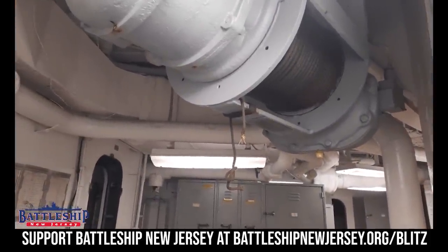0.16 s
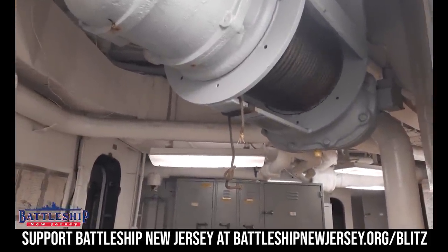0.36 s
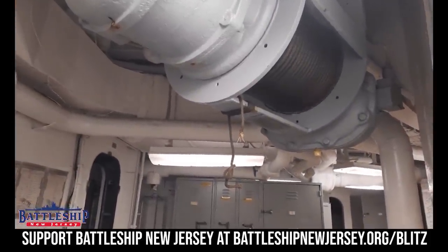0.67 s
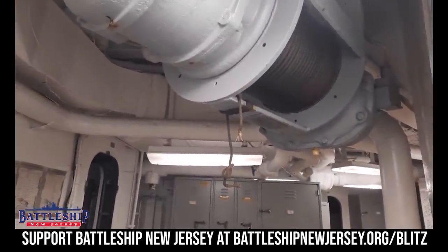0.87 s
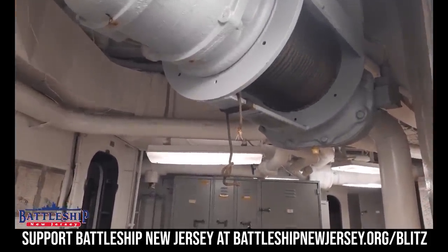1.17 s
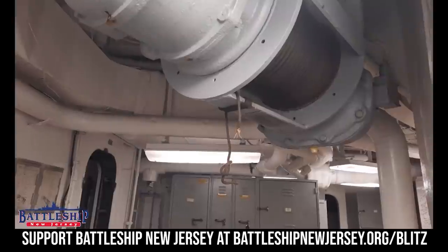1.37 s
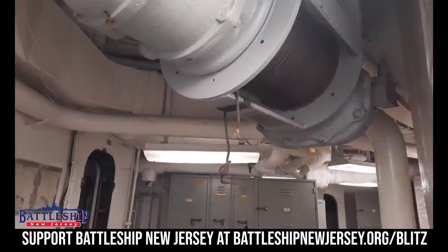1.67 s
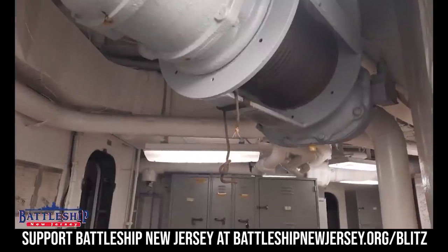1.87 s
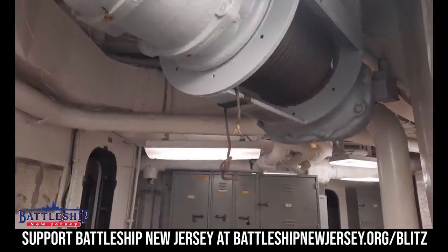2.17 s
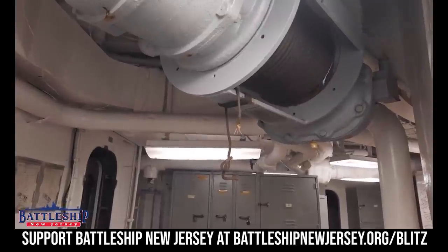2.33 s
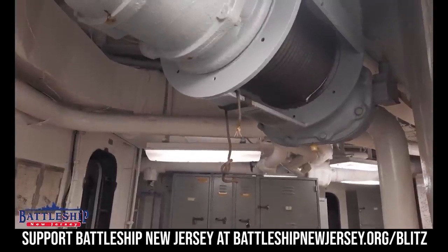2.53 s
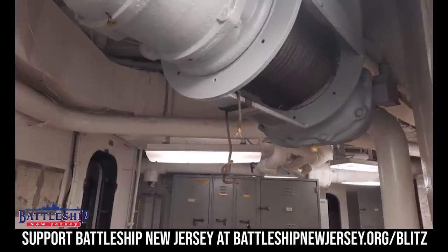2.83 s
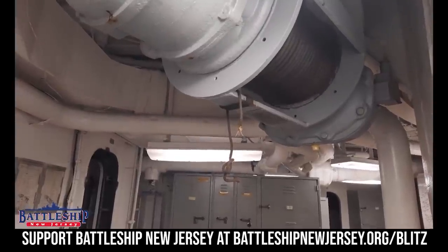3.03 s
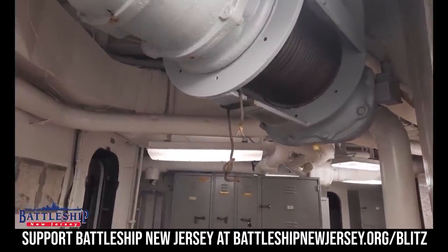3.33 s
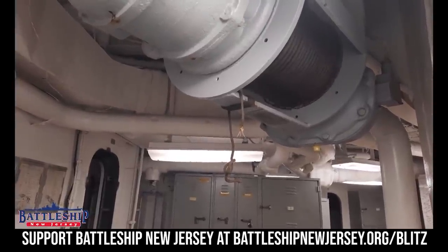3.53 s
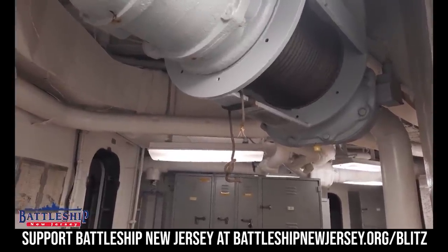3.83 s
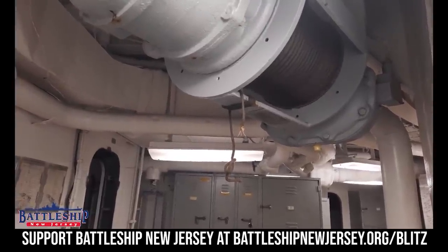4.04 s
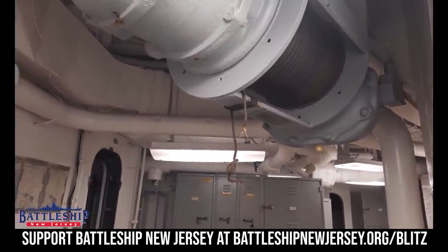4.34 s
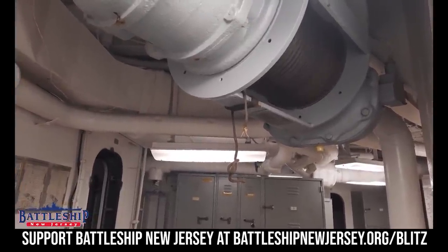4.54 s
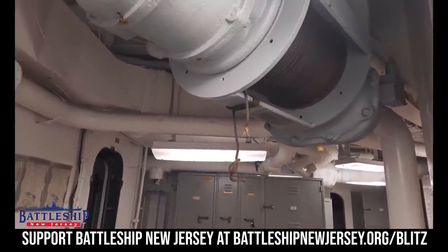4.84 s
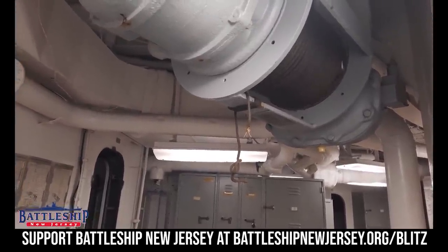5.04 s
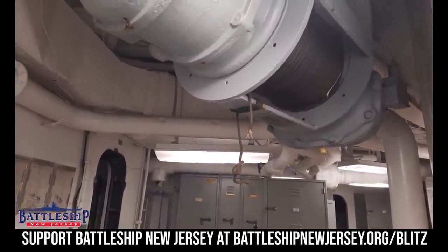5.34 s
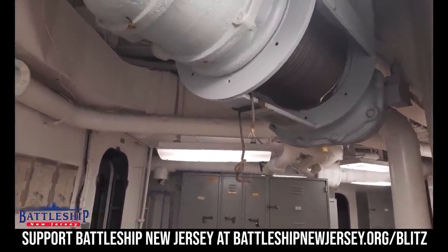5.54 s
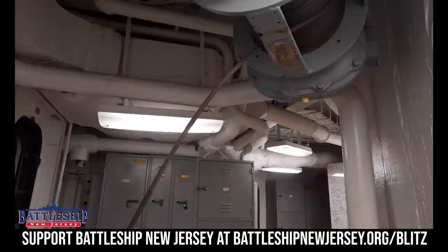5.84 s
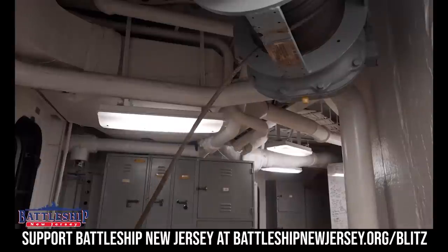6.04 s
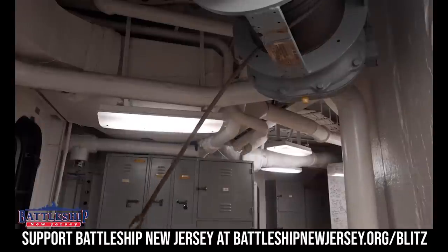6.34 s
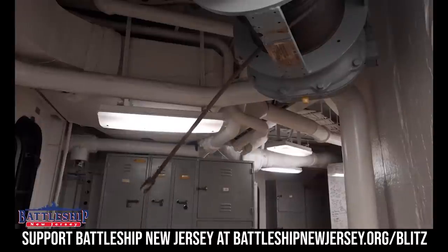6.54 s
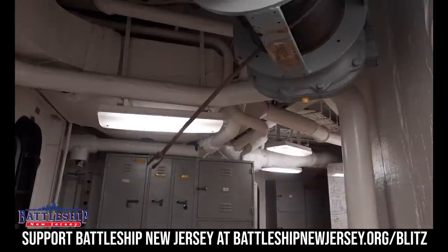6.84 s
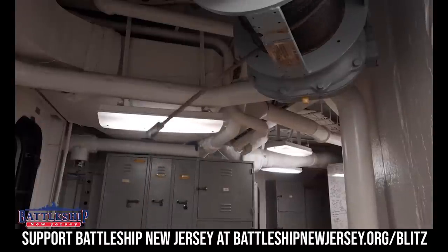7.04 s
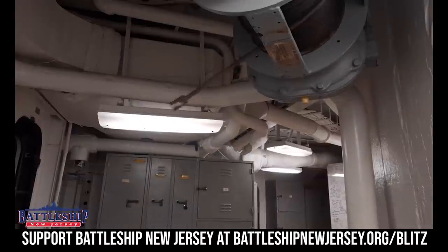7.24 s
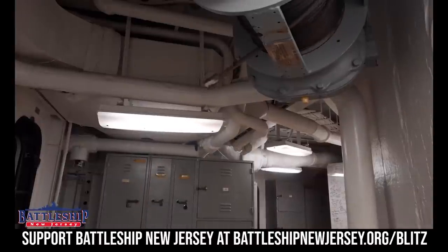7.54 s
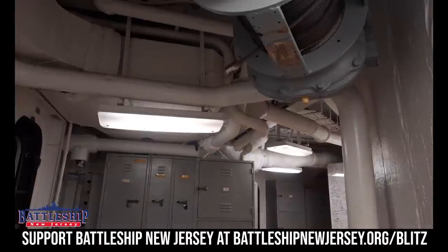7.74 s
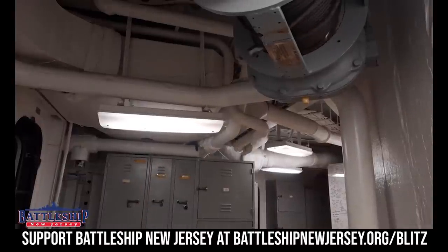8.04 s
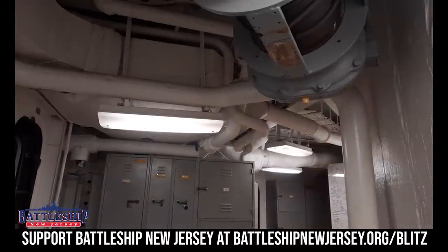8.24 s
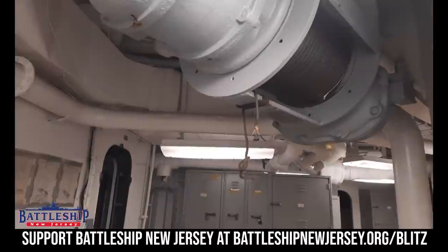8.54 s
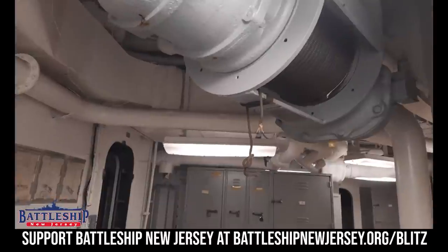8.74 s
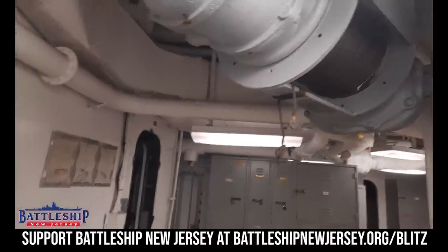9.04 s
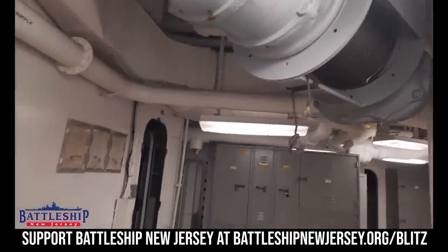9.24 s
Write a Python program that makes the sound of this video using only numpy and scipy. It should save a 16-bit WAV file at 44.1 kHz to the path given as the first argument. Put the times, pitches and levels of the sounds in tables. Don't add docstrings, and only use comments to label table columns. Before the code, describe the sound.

From 0 to about 5.1 seconds an electric hoist winch runs close by in muffled, narrow mono: a loud, steady, gritty gear grind strongest around 250 to 900 Hz, with a wavering whine. Slack cable slaps lightly near 0.8, 2.6 and 4.8. At 5.15 brake shoes crack, a duller second knock follows at 5.23, and the drum moans while its treble drains away. At 5.64 the sound drops abruptly to a distant, much quieter stereo perspective. A switch clacks at 5.77, the motor hums and winds cable, growing stronger from 7.1 to 8.0, with faint chain shivers and steel ticks, treble leaning right. It brakes at 8.06, with small clicks around 8.4. At 8.51 it cuts back to mono: a heavy metal clunk peaks around 8.55, bounces briefly and is damped by 8.8. Low ventilation rumble and electric hum remain, with a soft knock at 9.16.

```python
import sys
import numpy as np
from scipy import signal
from scipy.fft import rfft, irfft, next_fast_len
from scipy.io import wavfile
from scipy.ndimage import uniform_filter1d

SR = 44100
rng = np.random.default_rng(int(sys.argv[2]) if len(sys.argv) > 2 else 0)


def gain_from_db(level_db):
    decades = np.asarray(level_db, float) / 20
    return 10 ** decades


def persist_wave(psi):
    counts = np.round(np.clip(psi, -1, 1) * 32767).astype(np.int16)
    wavfile.write(sys.argv[1], SR, np.atleast_2d(counts).T)


N = 414540

PART_STARTS_S = [0, 5.64116, 8.50775]
CUT_PRESSURE = [.025, -.1, -.07]

SHAFT_HZ = 29.84
CLOSE_DB = -18
BRAKE_S, RUN_DOWN_S = 5.153, .13
# frequency in Hz, level in dB per Hz.
GRIND_COLOUR = [(15, -84), (25, -56), (69, -34.5), (118, -16), (190, -15.5), (250, -11), (342, -9),
                (382, -8), (418, -4), (665, -7), (760, -3), (969, -12), (1260, -10.5), (1480, -13),
                (1650, -9), (3830, -30.5), (5000, -41.5), (6500, -75), (11000, -120)]
# frequency in Hz, width in Hz, height in dB above the grind.
CASING_PEAKS = [(127, 49, 3), (172, 8, 4.5), (239, 23, 3), (267.4, 18, 6), (300, 12, 4), (312, 9.9, -5),
                (337, 20, 7), (351.2, 16, 5), (363, 13, 3), (382, 10, -2.5), (429.7, 12, 6), (438.4, 7, -6),
                (450, 9.1, 3), (462, 8, -3), (482.5, 20, 6), (500, 20, 6.5), (519, 7, -4), (530.2, 14, 10),
                (549.7, 14, 5.5), (600, 12, -3), (625, 16, 4.5), (640, 8, -2), (700, 20, -2), (737, 30, 5),
                (759, 20, 4), (784, 14, -6), (820, 10, -4), (860, 20, 2), (935, 26, 1.5), (955, 9.2, 2),
                (1035, 20, 4.5), (1070, 15, 1.5), (1290, 74, 1.5), (1460, 60, -2.5), (1573, 53, 3),
                (1660, 47, 1.5), (1850, 40, 2), (1888, 140, 4), (2210, 30, 1.5), (2270, 120, -3),
                (2456, 71, 3.5), (2709, 78, 7), (2820, 80, -3), (2960, 80, 1.5), (3767, 110, 6)]
# time in seconds, level in dB about the mean.
DRUM_LOAD = [(0.0, 0.5), (.04, 0), (.2, 0), (1.2, 0.5), (2.3, -1), (2.55, 0.5), (3.4, -0.5), (4.1, 0),
             (4.55, -0.5), (4.8, 1.5), (5.01, .5), (5.13, -1.5), (5.165, 2.5), (5.205, 1.5), (5.222, 0),
             (5.235, 2.5), (5.33, 2.5), (5.57, 0.9), (5.635, -6)]
# multiple of shaft speed, level in dB rms.
GEAR_WHINE = [(14, -29), (26, -31.5), (27, -34), (28, -29.5), (42, -37), (43, -38.5), (55, -37), (56, -37),
              (57, -43), (62, -39.5), (70, -42)]
# frequency in Hz, level in dB rms.
MOTOR_HUM = [(119.3, -45.5), (172.3, -46)]
# time in seconds, level in dB, brightness in dB per octave,
# scale of the decay time, rise in seconds.
BRAKE_BLOWS = [
    (5.139, -43.5, 9.5, 0.06, 0.0015),
    (5.1525, -23.5, 4, .06, .0008),
    (5.156, -22.5, -1.5, 0.35, 0.0026),
    (5.179, -35, -2, .06, .001),
    (5.2255, -13.5, -9, .05, .0006),
    (5.229, -12, -9.5, 0.71, 0.0045),
    (5.28, -22, -10, 0.87, 0.015),
]
# frequency in Hz, level in dB per Hz.
SHOE_COLOUR = [(300, -26), (1000, -12), (2500, -5), (3800, -2), (4700, 0), (5050, -5), (5150, -14)]
# frequency in Hz, time in seconds to fall by 60 dB.
SHOE_T60 = [(300, .4), (2000, 0.84), (5000, 0.53)]
# time in seconds,
# level in dB, brightness in dB per octave, # scale of the decay time, rise in seconds.
CABLE_RATTLES = [
    (.762, -30, 0, .15, .003),
    (2.626, -26, -2, .15, .003),
    (2.638, -21.5, 0, .25, .002),
    (3.125, -36, 2, .12, .002),
    (4.806, -25, 0, .2, .003),
    (4.84, -29, 0, .15, .002),
    (4.982, -31, 0, .12, .002),
    (5.154, -24, -2, .3, .001),
    (5.231, -30.5, 6, .55, .002),
]
# frequency in Hz, level in dB per Hz.
CABLE_COLOUR = [(1600, -21.5), (2100, -3), (2480, 0), (3000, -5.5), (3600, -16.5), (4900, -21)]
# time in seconds, peak in dB,
# frequency in Hz, 60 dB decay in seconds.
SHOE_CRACKS = [(5.153, -14, 840, .04), (5.178, -13.5, 385, 0.15), (5.225, -10, 630, .012),
               (5.1533, -9.5, 4900, 0.015), (5.1536, -11, 4350, .014), (5.1552, -16, 5000, .02),
               (4.6, -20, 2400, .015), (5.154, -19, 1800, .07), (5.1545, -13, 1700, .012),
               (5.158, -12.5, 2100, .01), (5.14, -32, 4950, .015), (5.2356, -23, 3500, .03),
               (5.203, -10, 700, .02)]
# time in seconds, peak in dB, frequency in Hz, 60 dB decay in seconds.
FRAME_THUMP = [
    (5.151, -16.5, 112, .11),
    (5.16, -24, 92, .2),
]
# frequency in Hz, width in Hz, level in dB at the bite,
# 60 dB decay in seconds.
DRUM_MODES = [(1860, 30.4, -27.5, 1.7), (2100, 30, -35.5, 1.7), (2280, 40, -36.5, 2),
              (2730, 45, -36.5, 1.5), (3768, 40, -40, 1.2), (520, 40, -23, 3), (744, 28, -19, 3.2)]
DRAG_S, DRAG_RISE_S = 5.23, .08
WARMING_HZ, WARMING_DB_PER_S = 330, -0.9
MESH_HZ, MESH_LOSS_DB_PER_S = 1600, 15
MOAN_HZ, MOAN_OCTAVES = 740, 0.64
CLOSE_MOAN_DB, CLOSE_MOAN_S = 5, .22
DULLING_DB_PER_S, DULL_HZ, DULL_OCTAVES = 30.5, 4200, 1.3
DECK_T60_S, DECK_DB = .4, -14
MONO_CUT_HZ, FRINGE_HZ, FRINGE_S = 5125, 5030, .028

FAR_DB = -45
FAR_ON_S, SPIN_UP_S, FAR_BRAKE_S = 5.775, .03, 8.06
FAR_MOAN_DB, FAR_MOAN_S = 6, .14
FAR_DULLING_DB_PER_S, FAR_DULLEST_S, FAR_DULL_HZ = 45, .2, 2200
# frequency in Hz, level in dB per Hz.
FAR_WINCH_COLOUR = [(15, -60), (25, -45), (41, -26), (70, -13), (113, -11.5), (133, -13), (148, -20.5),
                    (333, -9), (361, -13), (789, -20), (927, -24.5), (1720, -26.5), (3980, -47),
                    (4940, -50), (5960, -51.5), (15700, -68)]
# frequency in Hz, width in Hz, height in dB above the noise.
FAR_ROOM_PEAKS = [(119, 39, 3.5), (338, 49, 7.5), (772, 60, 5), (1180, 40, 1), (1280, 40, 2.5),
                  (1530, 80, 4.5), (1690, 35, 4), (2033, 93, 9), (2350, 280, 7), (2606, 50, 10.5),
                  (2770, 55, 9), (3010, 50, 1), (3520, 50, -1), (3700, 79, 3.5), (3880, 110, 6.5),
                  (4000, 240, 7), (4450, 90, 5), (6020, 140, 8), (13650, 4100, 4.5), (9800, 1500, -7)]
# time in seconds, level in dB.
FAR_HAUL = [
    (5.65, -1),
    (5.68, 0.5),
    (6.1, -2),
    (6.75, -1),
    (7.1, 0),
    (7.6, 6),
    (7.85, 5.5),
    (8.03, 7.5),
    (8.2, 7),
    (8.5, 0),
]
# frequency in Hz, change in dB.
MOTOR_OFF_LOSS = [(150, 2), (600, -12), (2300, -26), (4000, -20), (9000, -12)]
# frequency in Hz, level in dB rms.
FAR_HUM = [(101.4, -50), (119.8, -46), (147.5, -57), (172.3, -62), (331, -56)]
# multiple of shaft speed, level in dB rms.
FAR_GEAR_WHINE = [(26, -77), (35, -72), (39, -72), (43, -72), (52, -76), (56, -73), (57, -66.5)]
# time in seconds, peak in dB, frequency in Hz, 60 dB decay in seconds.
DECK_THUDS = [
    (5.81, -42, 58, .5),
    (5.87, -28, 127, .2),
    (8.365, -35.5, 172, 0.32),
]
# time in seconds, level in dB, brightness in dB per octave,
# scale of the decay time, rise in seconds.
CLACK_BLOWS = [(5.748, -62, 2.5, 0.54, .01), (5.758, -54, 0.5, .5, .003), (5.7665, -47, 2, .4, .001),
               (5.771, -39, 2.5, .3, .001), (5.7785, -35.5, 5, .08, .0005), (5.779, -33, 2, 0.85, 0.002),
               (5.8, -31, 1, 1.14, 0.014), (5.86, -44, -8, 0.76, 0.0075), (6.118, -52, 2, 0.68, .001),
               (6.175, -55, 0.5, .4, .003), (6.275, -68, -3.5, .4, 0.0027), (7.928, -49, 3.5, .3, 0.00097),
               (7.931, -45.5, 3.5, 0.71, 0.001), (8.02, -60.5, 3.5, 2.6, .004),
               (8.13, -55, 3.5, .5, 0.0089), (8.37, -53.5, 6, 0.57, 0.001), (8.428, -42, -1, .8, 0.0043),
               (8.449, -38, -2, 1.1, .004), (8.474, -62, 9.5, 0.05, 0.00043), (8.478, -70, 7.5, 0.46, .003)]
# frequency in Hz, level in dB per Hz.
STEEL_COLOUR = [(59, -50), (100, -18), (129, -12), (364, 1.5), (489, -6.5), (866, -2.5), (1270, -7.5),
                (2720, -12.5), (8520, -24.5), (10300, -36.5), (15700, -29.5)]
# frequency in Hz, time in seconds to fall by 60 dB.
STEEL_T60 = [(100, 0.98), (500, 1), (2000, 0.4), (6000, 0.36), (15000, 0.27)]
# frequency in Hz, width in Hz, level in dB.
HOOK_MODES = [(1690, 42, -11), (2000, 110, -4), (2630, 160, -12), (4690, 180, -5), (6570, 34, -14),
              (8030, 43, -25)]
# time in seconds, peak in dB, frequency in Hz, 60 dB decay in seconds.
STEEL_PINGS = [(6.118, -66, 11250, .15), (6.12, -59, 4740, .22), (6.119, -60, 5050, .15),
               (6.119, -60, 6600, .1), (6.12, -60, 4100, .1), (7.085, -65, 6500, .06),
               (6.119, -58, 5900, .08), (8.024, -57, 7900, .1), (8.375, -58, 4690, .2),
               (8.429, -44, 1700, 0.1), (8.428, -43, 2100, .06), (8.452, -50, 2600, .08),
               (8.42, -58, 4750, .08), (8.45, -40, 1800, 0.04), (8.374, -46, 1500, .08),
               (7.925, -44, 1680, .15), (7.93, -46, 1400, .12), (8.45, -58, 6050, .15),
               (5.7715, -31, 2450, .03), (8.37, -56, 8600, .04), (8.395, -56, 4750, .06),
               (8.4739, -50, 15000, .012), (8.4745, -48.5, 12800, .012)]
# time in seconds, peak in dB, frequency in Hz.
CHAIN_SHIVERS = [(6.2752, -43, 1980), (6.3425, -45, 1490), (6.4153, -42, 1670), (6.5106, -41, 1660),
                 (6.788, -46, 1670), (6.9486, -45, 1690), (7.0853, -45, 1680), (7.1242, -47, 1500),
                 (7.2445, -45, 1990), (7.2899, -44, 1500), (7.4575, -36, 1680), (7.5912, -39, 1680),
                 (7.6969, -40, 1490), (7.7463, -37, 2020), (7.7917, -38, 1680), (7.892, -40, 1560)]
SHIVER_DB, SHIVER_T60_S, SHIVER_OCTAVES = -9, .2, .67
# frequency in Hz, likeness from -1 to 1.
EAR_LIKENESS = [(60, 0.88), (130, 0.92), (290, 0.68), (640, 0.48), (1410, -0.38), (3100, 0.13),
                (6820, 0.094), (15000, -0.01)]
# frequency in Hz, left minus right in dB.
EAR_LEAN = [(60, -1.0), (110, 0.0), (200, 0.0), (380, 0.5), (700, 1.5), (1290, -1.0), (2380, -6.5),
            (4400, -14.5), (8120, -28), (15000, -25)]

# time in seconds, level in dB, brightness in dB per octave,
# scale of the decay time, rise in seconds.
CLUNK_BLOWS = [
    (8.507, -28, -1, 0.46, .0005),
    (8.514, -30, 1, .3, .003),
    (8.521, -12.5, 3, 0.83, 0.0047),
    (8.545, -14, -1.5, 0.64, 0.0075),
    (8.585, -14, -3.5, 0.36, 0.0069),
    (8.68, -28, -4.5, 1, 0.018),
    (9.162, -46, -6, 0.12, .002),
]
# frequency in Hz, level in dB per Hz.
LOAD_COLOUR = [(35, -72), (60, -46), (108, -22), (141, -31), (160, -14.5), (240, -5.5), (486, -4.5),
               (831, -4.5), (894, -12), (1040, -8), (1470, -18), (2470, -20.5), (4880, -38.5), (5150, -62),
               (6500, -90), (11000, -120)]
# frequency in Hz, width in Hz, height in dB.
LOAD_PEAKS = [(242, 30, 3.5), (342, 50, 5), (479, 40, 3.5), (550, 40, 4), (700, 50, 2), (851, 50, 3),
              (1023, 50, 4), (1179, 50, 2), (1604, 60, 2), (1860, 90, 4.5), (2100, 60, 3), (2604, 80, 2.5),
              (2772, 60, 3), (3362, 80, 3), (4041, 100, 3)]
# frequency in Hz, time in seconds to fall by 60 dB.
LOAD_T60 = [(100, 0.89), (400, 0.76), (1500, 0.65), (5000, 0.46)]
# time in seconds, peak in dB, frequency in Hz, 60 dB decay in seconds.
BRACKET_RING = [
    (8.519, -22, 1850, .12),
    (8.524, -26, 1990, .1),
    (8.53, -26, 2500, .12),
    (8.525, -38, 4850, .15),
    (8.527, -38, 4000, .12),
]
# time in seconds, peak in dB, frequency in Hz, 60 dB decay in seconds.
CRADLE_BOUNCES = [(8.5078, -17, 450, .05), (8.757, -23, 330, .09), (8.785, -27, 300, .08),
                  (8.530, -9, 480, .02), (8.536, -6, 380, 0.025), (8.544, -10, 1010, .015),
                  (8.5473, -3, 350, 0.039), (8.559, -10, 990, .015), (8.561, -9, 330, 0.027),
                  (8.566, -9, 900, .018), (8.577, -7, 450, 0.022), (8.579, -7, 750, .015),
                  (8.591, -5, 520, .025), (8.610, -9, 370, .022), (8.620, -12, 620, .016),
                  (8.626, -12, 260, .03), (8.643, -11, 330, .025), (8.652, -16, 700, .015),
                  (8.701, -18, 331, .08), (8.727, -17, 354, 0.1), (8.83, -29, 160, .12),
                  (9.163, -30, 520, 0.037)]
DAMPED_S, DAMPING_DB_PER_S = 8.7, 84
CLUNK_EVEN = .5
SHIP_DB = -37.5
# frequency in Hz, level in dB per Hz.
SHIP_COLOUR = [(15, -87), (25, -57), (85, -19), (132, -5), (240, -17.5), (313, -17), (357, -19),
               (391, -18.5), (622, -20), (777, -28.5), (927, -29), (1160, -36), (1500, -41.5),
               (2600, -49.5), (3600, -51.5), (5000, -49), (6500, -84), (11000, -120)]
# frequency in Hz, width in Hz, height in dB above the noise.
DUCT_PEAKS = [(125, 22, 4), (141, 12, 1.5), (238, 22, 10.5), (645, 10, 9)]
# frequency in Hz, level in dB rms.
SHIP_HUM = [(172.3, -44), (360.5, -48.5)]


def close_winch(t):
    running = np.exp(-np.maximum(t - BRAKE_S, 0) / RUN_DOWN_S)
    speed_hz = SHAFT_HZ * (1 + .0016 * drift(t, 1.544)) * (.95 + .05 * running)
    turns = np.cumsum(speed_hz) / SR
    whine = tones(t, GEAR_WHINE, turns, flutter_db=4.5, rate=7.0)
    motor = tones(t, MOTOR_HUM, t, flutter_db=4.5, rate=5.0)
    return gear_grind(t, turns) + running * (whine + motor) + brake(t) + drum_ring(t) + cable_rattle(t)


def gear_grind(t, turns):
    slow = t[::16]
    load_db = np.interp(slow, *np.transpose(DRUM_LOAD))
    together = drift(slow, 11.0)
    age = np.maximum(slow - BRAKE_S, 0)

    def envelope(hz):
        warm_db = WARMING_DB_PER_S * (slow - 2.5) * bell(hz, WARMING_HZ, .76)
        stop_db = braking_db(age, hz, CLOSE_MOAN_DB, CLOSE_MOAN_S, DULLING_DB_PER_S, DULL_HZ)
        stop_db -= MESH_LOSS_DB_PER_S * age * bell(hz, MESH_HZ, .23)
        chance_db = .72 * together + 1.37 * drift(slow, 7.4)
        return gain_from_db(CLOSE_DB + load_db + warm_db + stop_db + chance_db)
    return played(t, bands(deck(teeth(t, turns)), GRIND_COLOUR, CASING_PEAKS), envelope)


def teeth(t, turns):
    hits = rng.random(len(t)) < 4000 / SR
    strength = gain_from_db(2.5 * np.minimum(rng.exponential(1, len(t)), 4))
    grains = hits * strength * rng.choice([-1, 1], len(t))
    turn_throb = 1 + .05 * np.cos(2 * np.pi * turns) + .07 * np.cos(4 * np.pi * turns)
    tooth_throb = 1 + .15 * np.cos(28 * np.pi * turns)
    return turn_throb * tooth_throb * (rms_one(grains) + 1.25 * rng.standard_normal(len(t)))


def brake(t):
    shoes = bands(rng.standard_normal(len(t)), SHOE_COLOUR, [])
    slam = played(t, shoes, lambda hz: blows(BRAKE_BLOWS, SHOE_T60, t[::16], hz))
    return slam + pings(t, SHOE_CRACKS) + pings(t, FRAME_THUMP)


def drum_ring(t):
    out, near = np.zeros(len(t)), t > DRAG_S
    age = t[near] - DRAG_S
    for hz, width_hz, db, t60 in DRUM_MODES:
        r = np.exp(-np.pi * width_hz / SR)
        resonator = [1, -2 * r * np.cos(2 * np.pi * hz / SR), r * r]
        rubbed = rms_one(signal.lfilter([1, 0, -1], resonator, rng.standard_normal(SR)))
        out[near] += gain_from_db(db - 60 * age / t60) * (1 - np.exp(-age / DRAG_RISE_S)) * rubbed[-len(age):]
    return out


def cable_rattle(t):
    cable = bands(rng.standard_normal(len(t)), CABLE_COLOUR, [])
    return played(t, cable, lambda hz: blows(CABLE_RATTLES, SHOE_T60, t[::16], hz))


def far_winch(t):
    slow = t[::16]
    haul_db, together = np.interp(slow, *np.transpose(FAR_HAUL)), drift(slow, 11.0)
    at_rest = np.exp(-np.maximum(slow - FAR_ON_S, 0) / SPIN_UP_S)
    braked = np.clip(slow - FAR_BRAKE_S, 0, FAR_DULLEST_S)

    def envelope(hz):
        rest_db = at_rest * at_hz(MOTOR_OFF_LOSS, hz)
        stop_db = braking_db(braked, hz, FAR_MOAN_DB, FAR_MOAN_S, FAR_DULLING_DB_PER_S, FAR_DULL_HZ)
        return gain_from_db(FAR_DB + haul_db + rest_db + stop_db + together + 1.5 * drift(slow, 8.0))
    run = played(t, stereo_bands(t, FAR_WINCH_COLOUR, FAR_ROOM_PEAKS), envelope)
    hum_level = np.interp(t, slow, gain_from_db(haul_db - 1.5 - 20 * braked))
    hum = hum_level * tones(t, FAR_HUM, t, flutter_db=-.5, rate=3.0)
    powered = np.interp(t, slow, gain_from_db(haul_db) * (1 - at_rest) * np.exp(-braked / RUN_DOWN_S))
    whine = powered * tones(t, FAR_GEAR_WHINE, SHAFT_HZ * t, flutter_db=2.5, rate=5.0)
    return run + hum + whine + pings(t, DECK_THUDS) + clacks_and_hook(t)


def clacks_and_hook(t):
    slow = t[::16]
    peaks = [(hz, width, 4.5 + .14 * db) for hz, width, db in HOOK_MODES]
    steel = stereo_bands(t, STEEL_COLOUR, peaks)
    out = played(t, steel, lambda hz: np.sqrt(blows(CLACK_BLOWS, STEEL_T60, slow, hz) ** 2 + shivers(slow, hz)))
    for s, db, hz, t60 in STEEL_PINGS:
        left_right = gain_from_db([[4 + at_hz(EAR_LEAN, hz)], [4]])
        out += left_right * ping(t, s, db, hz, t60)
    return out


def shivers(t, hz):
    power = np.zeros(len(t))
    for s, db, pitch in CHAIN_SHIVERS:
        level_db = db + SHIVER_DB - 60 * np.clip(t - s, 0, 1) / SHIVER_T60_S
        power += (t > s) * gain_from_db(2 * level_db) * bell(hz, pitch, SHIVER_OCTAVES)
    return power


def clunk(t):
    slow = t[::16]
    settled = np.maximum(slow - DAMPED_S, 0) * (slow < 9.1)
    struck = evened(bands(rng.standard_normal(len(t)), LOAD_COLOUR, LOAD_PEAKS), CLUNK_EVEN)

    def choked(hz):
        damping = gain_from_db(-DAMPING_DB_PER_S * settled * (hz / 1000) ** .4)
        return blows(CLUNK_BLOWS, LOAD_T60, slow, hz) * damping
    return played(t, struck, choked) + pings(t, BRACKET_RING) + pings(t, CRADLE_BOUNCES)


def ship(t):
    air = bands(rng.standard_normal(len(t)), SHIP_COLOUR, DUCT_PEAKS)
    draught = played(t, air, lambda hz: gain_from_db(SHIP_DB + 1.5 * drift(t[::16], 5.0)))
    return draught + tones(t, SHIP_HUM, t, flutter_db=2.2, rate=4.0)


def braking_db(age, hz, moan_db, moan_s, dulling_db, dull_hz):
    moan = (age / moan_s * np.exp(1 - age / moan_s)) ** 2
    lost_db = dulling_db * age * bell(hz, dull_hz, DULL_OCTAVES)
    return moan_db * moan * bell(hz, MOAN_HZ, MOAN_OCTAVES) - lost_db


def blows(rows, t60s, t, hz):
    power = np.zeros(len(t))
    for s, db, tilt_db, scale, rise in rows:
        age = np.maximum(t - s, 0)
        decay = np.minimum(age / (scale * at_hz(t60s, hz)), 4)
        level = gain_from_db(db + tilt_db * np.log2(hz / 1000) - 60 * decay)
        power += (level * (1 - np.exp(-age / rise))) ** 2
    return np.sqrt(power)


def ping(t, s, db, hz, t60):
    out, start = np.zeros(len(t)), np.searchsorted(t, s)
    age = t[start:start + int(2 * t60 * SR)] - s
    attack = 1 - np.exp(-age * np.minimum(.5 * hz + 300, 3000))
    out[start:start + len(age)] = gain_from_db(db - 60 * age / t60) * np.sin(2 * np.pi * hz * age) * attack
    return out


def pings(t, rows):
    return sum(ping(t, *row) for row in rows)


def tones(t, lines, cycles, flutter_db, rate):
    out = np.zeros(len(t))
    for multiple, db in lines:
        level = gain_from_db(db + 2.5 + flutter_db * drift(t, rate))
        out += level * np.sin(2 * np.pi * (multiple * cycles + rng.random()))
    return out


def bands(source, spectrum, peaks):
    length = source.shape[-1]
    size = next_fast_len(length)
    hz = np.maximum(np.arange(size // 2 + 1) * SR / size, 1)
    top_hz = spectrum[-1][0]
    lift_db = sum(db / (1 + (2 * (hz - f) / width) ** 2) for f, width, db in peaks)
    shaped = rfft(source, size) * gain_from_db(at_hz(spectrum, hz) + lift_db) * (hz < top_hz)
    shaped = shaped / np.sqrt(2 * np.mean(np.sum(np.abs(shaped) ** 2, -1))) * size
    for centre in 25 * 2 ** np.arange(0, np.log2(top_hz / 25) + 1 / 3, 1 / 3):
        if centre < .7 * spectrum[0][0]:
            continue
        share = np.cos(np.pi / 2 * np.clip(3 * np.log2(hz / centre), -1, 1)) ** 2
        yield centre, irfft(shaped * share, size)[..., :length]


def stereo_bands(t, spectrum, peaks):
    for hz, mid_side in bands(rng.standard_normal((2, len(t))), spectrum, peaks):
        yield hz, pair(mid_side, hz)


def pair(mid_side, hz):
    alike = np.clip(at_hz(EAR_LIKENESS, hz), -.95, .99)
    left, right = gain_from_db(at_hz(EAR_LEAN, hz) * np.array([.5, -.5]))
    mid = np.sqrt((1 + alike) / 2) * mid_side[0]
    side = np.sqrt((1 - alike) / 2) * mid_side[1]
    norm = np.sqrt(left ** 2 + right ** 2 + 2 * alike * left * right) / 2
    return np.array([left * (mid + side), right * (mid - side)]) / norm


def evened(split, share):
    for hz, x in split:
        power = uniform_filter1d(x ** 2, size=int(14 * SR / hz) + 1)
        yield hz, x * (np.mean(power) / (np.abs(power) + 1e-20)) ** (share / 2)


def played(t, split, envelope):
    return sum(np.interp(t, t[::16], envelope(hz)) * x for hz, x in split)


def deck(x):
    age = np.arange(SR // 2) / SR
    tail = rng.standard_normal(len(age)) * gain_from_db(-60 * age / DECK_T60_S)
    tail *= gain_from_db(DECK_DB) / np.sqrt(np.sum(tail ** 2))
    return (x + signal.fftconvolve(x, tail)[:len(x)]) / np.sqrt(1 + gain_from_db(2 * DECK_DB))


def narrow(x):
    low_pass = signal.ellip(14, .2, 95, MONO_CUT_HZ, fs=SR, output="sos")
    wide = signal.sosfilt(low_pass, np.tanh(x))
    high_pass = signal.ellip(8, .1, 50, FRINGE_HZ, "high", fs=SR, output="sos")
    fringe = signal.sosfiltfilt(high_pass, wide)
    patch = round(FRINGE_S * SR)
    dropped = np.repeat(rng.random(len(x) // patch + 1) < .35, patch)[:len(x)]
    return np.tile(wide - uniform_filter1d(1. * dropped, size=400) * fringe, (2, 1))


def drift(t, rate):
    knots = signal.lfilter([1, 2, 1], [1], rng.standard_normal(int((t[-1] - t[0]) * 200) + 400))
    r = np.exp(-2 * np.pi * rate / 200)
    smooth = rms_one(signal.lfilter([1], [1, -r], knots)[300:])
    return np.interp((t - t[0]) * 200, np.arange(len(smooth)), smooth)


def bell(hz, centre_hz, octaves):
    return np.exp(-(np.log2(hz / centre_hz) / octaves) ** 2)


def at_hz(points, hz):
    table_hz, values = np.transpose(points)
    return np.interp(np.log(hz), np.log(table_hz), values)


def rms_one(x):
    return x / np.sqrt(np.mean(x ** 2) + 1e-20)


def scene():
    t = np.arange(N) / SR
    first, second = (round(s * SR) for s in PART_STARTS_S[1:])
    close = narrow(close_winch(t[:first]))
    far = far_winch(t[first:second])
    last = narrow(clunk(t[second:]) + ship(t[second:]))
    close += (CUT_PRESSURE[0] - close[:, :1]) * np.exp(-t[:first] * 2500)
    close += (CUT_PRESSURE[1] - close[:, -1:]) * np.exp(-((t[:first] - t[first]) * 2500) ** 2)
    last += (CUT_PRESSURE[2] - last[:, :1]) * np.exp((t[second] - t[second:]) * 2500)
    out = np.concatenate([close, far, last], axis=1)
    out[:, [first, second - 1]] = (out[:, [first - 1, second - 2]] + out[:, [first + 1, second]]) / 2
    return out


def band_limit(x):
    return signal.sosfilt(signal.butter(12, 15890, fs=SR, output="sos"), x)


def record(dry):
    fade = np.minimum(np.arange(N)[::-1] / 200, 1)
    return band_limit(dry * fade)


dry = scene()
out = record(dry)
persist_wave(out)
```